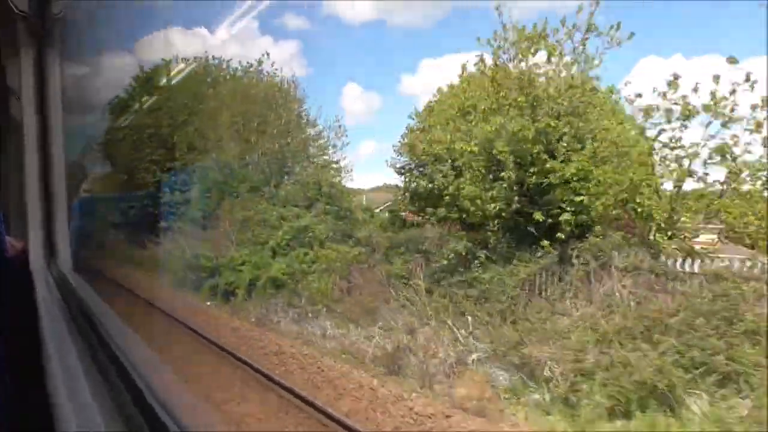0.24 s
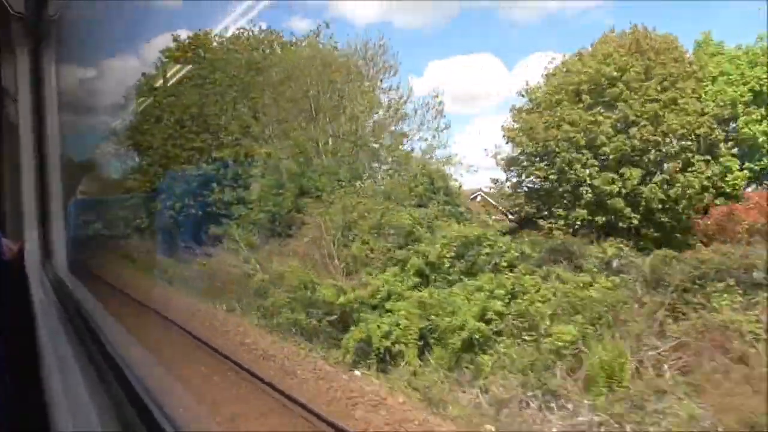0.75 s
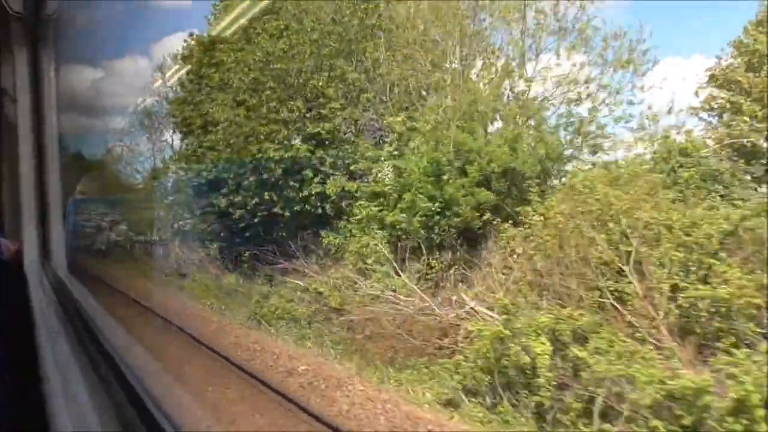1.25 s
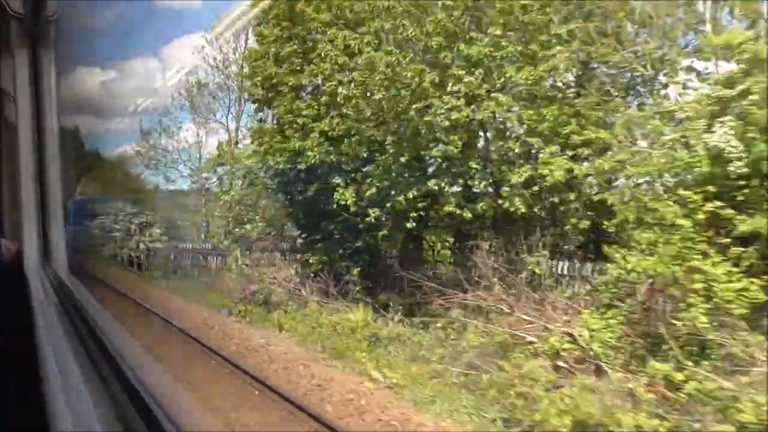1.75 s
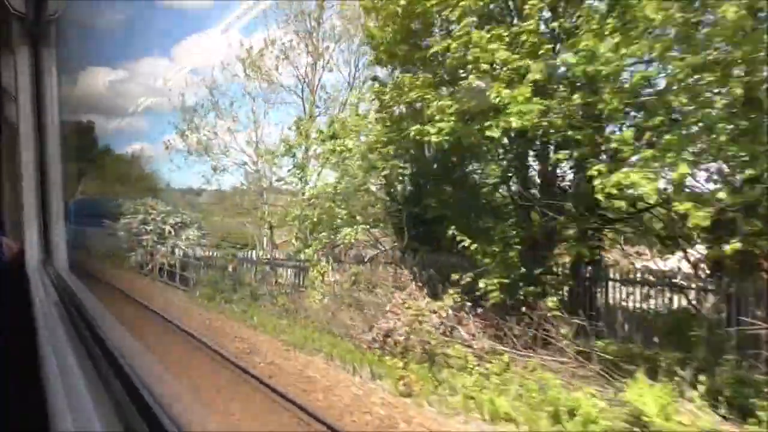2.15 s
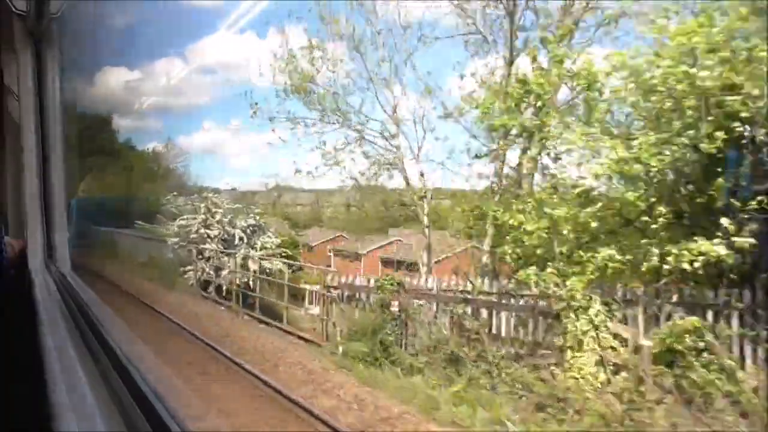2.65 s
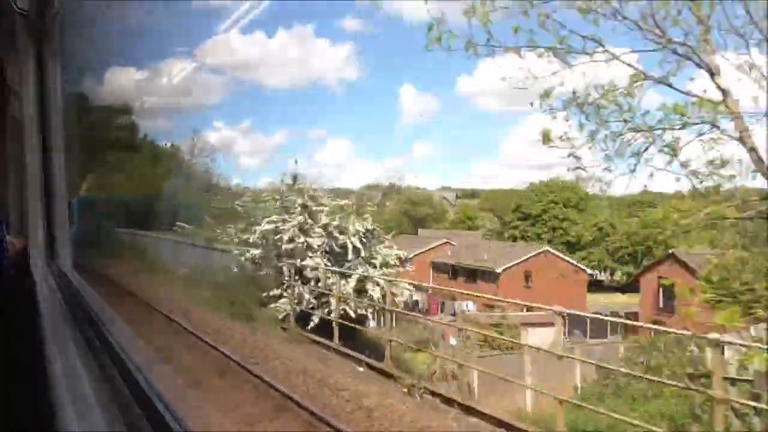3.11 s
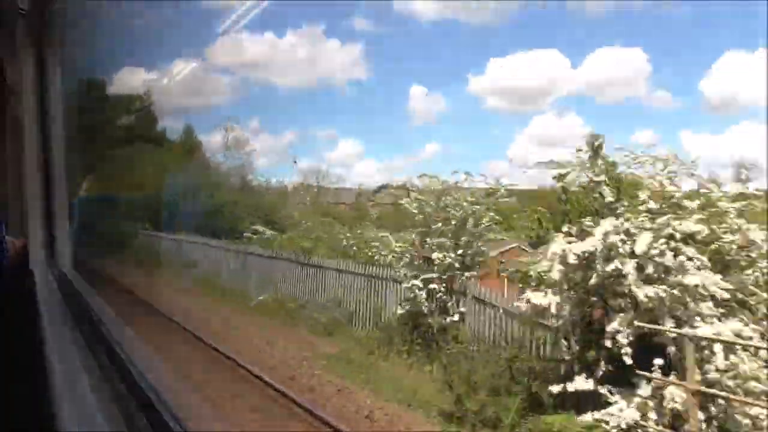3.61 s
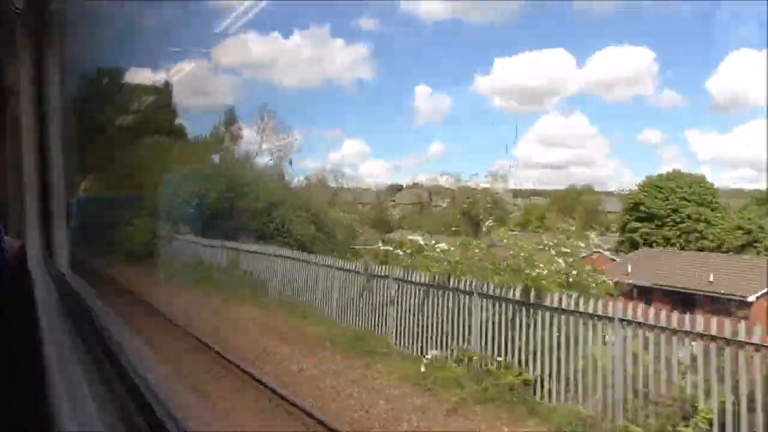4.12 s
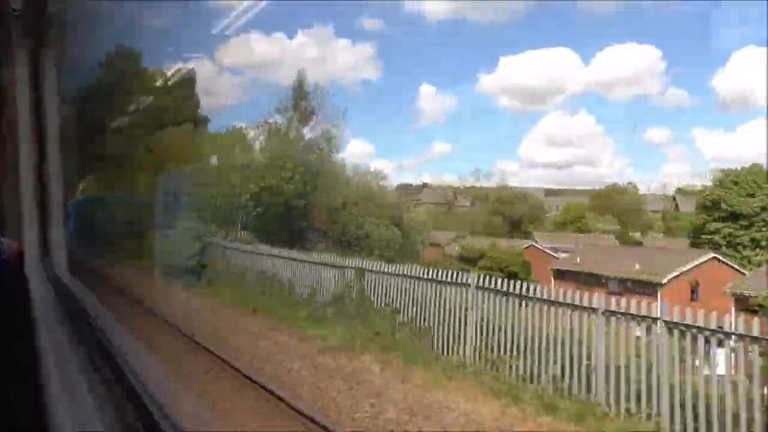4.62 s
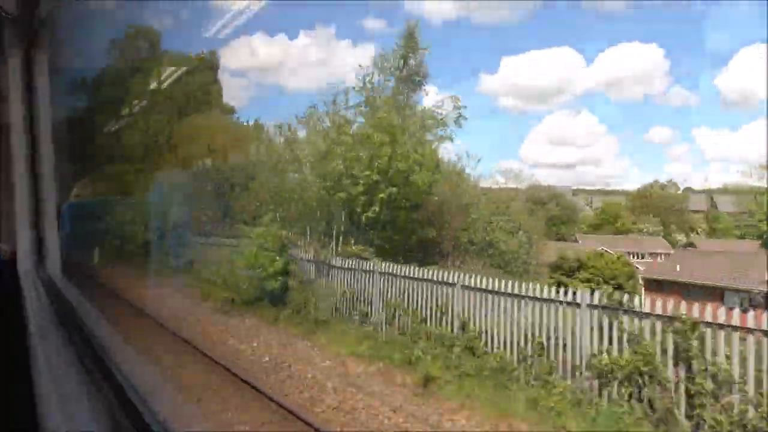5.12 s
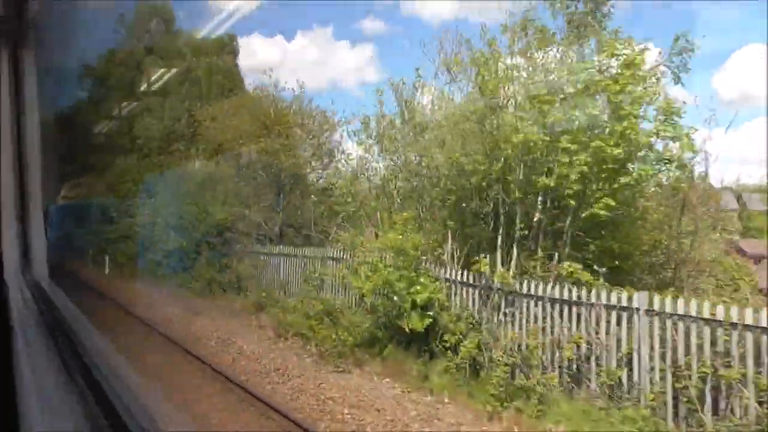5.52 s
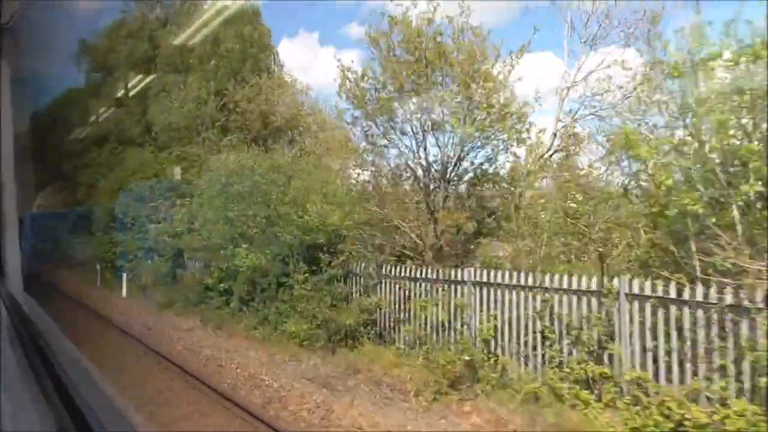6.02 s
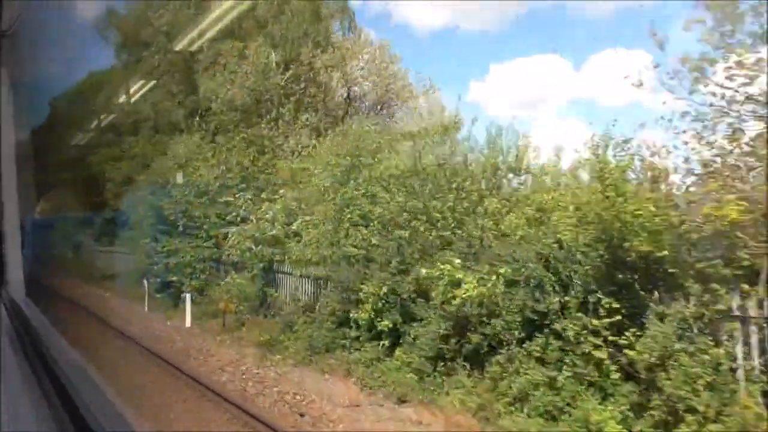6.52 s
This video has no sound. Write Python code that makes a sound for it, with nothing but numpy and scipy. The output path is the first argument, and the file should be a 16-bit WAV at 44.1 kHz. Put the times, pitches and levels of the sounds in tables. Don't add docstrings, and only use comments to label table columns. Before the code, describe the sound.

Inside a passenger coach beside the window, a diesel engine drones steadily under the floor with a slowly beating compressor hum. Wheels rumble continuously, with dull joint knocks and hollow booms around two seconds and a bridge near three. A low singing rail tone swells at about five seconds, while air hisses softly past the glass. Close stereo cabin perspective.

```python
import sys
import numpy as np
from scipy import signal
from scipy.fft import rfft, irfft, next_fast_len
from scipy.io import wavfile
from scipy.ndimage import uniform_filter1d, map_coordinates

SR = 44100
rng = np.random.default_rng(int(sys.argv[2]) if len(sys.argv) > 2 else 0)


def ratio(d):
    e = np.asarray(d, float) / 20
    return 10 ** e


def output_pcm(signal):
    pcm = np.clip(np.atleast_2d(signal).T, -1, 1) * 32767
    wavfile.write(sys.argv[1], SR, np.round(pcm).astype(np.int16))


N = 297675
TIME = np.arange(N) / SR


def unit(x):
    return x / np.sqrt(np.mean(x ** 2) + 1e-20)


def along(points, hz, column=1):
    rows = np.array(points)
    return np.interp(np.log(hz + 1), np.log(rows[:, 0] + 1), rows[:, column])


def curves(rows):
    s, *columns = np.transpose(rows)
    return [np.interp(TIME, s, column) for column in columns]


def wobble(rate):
    coarse = np.arange(0, N + 64, 64)
    knots = rng.standard_normal(int(N * rate / SR) + 4)
    return np.interp(np.arange(N), coarse, map_coordinates(knots, [coarse * rate / SR]))


def swell(start, rise, length, fall):
    return np.interp(TIME, np.cumsum([start, rise, length, fall]), [0, 1, 1, 0])


def filtered(x, response):
    m = next_fast_len(N + 8192)
    return irfft(rfft(x, m) * response(np.fft.rfftfreq(m, 1 / SR)), m)[..., :N]


def angle(hz):
    return 2 * np.pi * np.cumsum(hz * np.ones(N)) / SR


def tone(phase, db):
    return np.sqrt(2) * ratio(db) * np.cos(phase)


# frequency in Hz, likeness from 0 to 1,
# excess level at the left in dB, phase lead of the left in rad.
PORT_PAIR = [(20, .75, -1, .3), (60, .98, 0.5, 0.21), (150, 1, 1, 0.16), (400, 0.96, 0.6, 0.13),
             (600, .96, 0, .1), (724, 0.95, -2, 0.23), (870, 0.9, -3.5, 0.42), (1116, 0.66, -6, 1.1),
             (1300, 0.2, -4, 2.93), (1480, 0.1, 2.5, 3.55), (1870, 0.73, 1, 7), (2100, 0.7, 1, 6),
             (2660, 0.12, -1.5, 6.5), (3200, 0.44, 3.5, 4.6), (3900, 0.86, 2, 6.6), (5300, 0.4, 0, 6.5),
             (6600, 0.07, -0.5, 5.1), (8100, 0, 3, 3.8), (9400, 0.28, 3.2, 3.95), (11800, 0.35, 2.5, 3.8),
             (13500, 0.2, .8, 4), (15000, 0.2, 1, 6.3)]


def noise(spectrum, patchy_db):
    z = signal.stft(rng.standard_normal((2, N)), nperseg=1024)[2]
    field = uniform_filter1d(rng.standard_normal(z.shape[1:]), size=8, axis=0)
    field = uniform_filter1d(field, size=8, axis=1)
    pair = signal.istft(z * ratio(patchy_db * unit(field)), nperseg=1024)[1][:, :N]

    def mixing(hz):
        turn = np.arccos(np.clip(along(PORT_PAIR, hz), 0, 1)) / 2
        return ratio(along(spectrum, hz)) * [np.cos(turn), np.sin(turn)]

    same, other = filtered(pair, mixing)
    return np.array([same + other, same - other]) / np.std(same)


# time in seconds, crank speed in rpm.
CRANK_SPEED = [(0, 1799.85), (1.2, 1799.85), (2.1, 1799.1), (3.1, 1797.5), (3.65, 1799.8), (4.1, 1800.3),
               (5.9, 1800.3), (6.75, 1799.6)]


def engine_cycle():
    return angle(curves(CRANK_SPEED)[0] / 120)


# multiple of the cycle rate (6 is the firing rate), level in dB rms.
ENGINE_ORDERS = [(3, -50), (6, -32), (7, -33), (8, -35), (9, -22), (10, -24), (11, -42), (12, -27),
                 (13, -33.5), (14, -29), (15, -33), (16, -35), (17, -44), (18, -40), (19, -42), (20, -39),
                 (21, -43), (22, -30.5), (24, -34), (25, -40), (32, -40), (35, -48), (39, -47), (42, -45),
                 (43, -47), (46, -43.5), (48, -37.5), (50, -48), (52, -47), (54, -48)]
MOUNT_ORDERS = (8, 11, 13, 15, 18, 20)


def engine(cycle):
    hum = np.zeros(N)
    for order, db in ENGINE_ORDERS:
        start = .345 * order - 6.1 + 3.2 * (order == 6) + 2.2 * (order in MOUNT_ORDERS)
        if order >= 30:
            start = 2 * np.pi * rng.random()
        unsteady = order / 12
        phase = order * cycle + start + .04 * unsteady * wobble(2)
        hum += tone(phase, db + .3 * unsteady * wobble(2))
    return hum


def unevenness(cycle):
    orders = np.setdiff1d(np.arange(23, 73), [order for order, db in ENGINE_ORDERS])
    turn = np.linspace(0, 2 * np.pi, 4096)
    shape = np.zeros(len(turn))
    level_db, scatter_db = -53, 3.5
    for order in orders:
        start = 2 * np.pi * rng.random()
        shape += tone(order * turn + start, level_db + scatter_db * rng.standard_normal())
    return np.interp(cycle % (2 * np.pi), turn, shape)


# multiple of the stroke rate, level in dB rms.
STROKE_HARMONICS = [(1, -44), (2, -27), (3, -40), (4, -50), (5, -49), (6, -51)]


def compressor():
    stroke_hz = 97.22
    load_db = np.linspace(-1.8, 1.2, N)
    stroke = angle(stroke_hz) - .3
    drone = np.zeros(N)
    for k, db in STROKE_HARMONICS:
        drone += tone(k * stroke + .05 * k * wobble(3), db + load_db + .6 * wobble(4))
    return drone


def turbocharger():
    lock_s, crest_s = 3.35, 4.85
    hunting_hz = 5352 + 9 * wobble(25)
    hunting = swell(-1, 1, lock_s - 1, 1) * tone(angle(hunting_hz), -64 + 3 * wobble(5))
    arch_hz = 5381 - 3 * (TIME - crest_s) ** 2
    locked = swell(lock_s, .2, 2.7, .8) * tone(angle(arch_hz + .7 * wobble(5)), -61.5 + wobble(3))
    return hunting + locked


# frequency in Hz, density in dB per Hz.
RUMBLE_SPECTRUM = [(15, -30), (22, -15), (40, -13.5), (55, -6.5), (76, -2), (102, -1.5), (135, -0.5),
                   (165, 4.5), (215, 4), (270, -2), (320, 1), (380, -6.5), (520, -11.5), (700, -58.5)]


def wheel_rumble(hollow, jolt):
    return ratio(-25.5 + 0.5 * hollow + 0.26 * jolt) * noise(RUMBLE_SPECTRUM, patchy_db=0.5)


# frequency in Hz, density in dB per Hz.
ROAR_SPECTRUM = [(250, -49), (350, -4), (450, -1.5), (580, 0.5), (720, 1), (860, -3), (1040, -5.5),
                 (1250, -11.5), (1500, -19), (1800, -37), (2400, -52)]


def body_roar(hollow, echo_db, firing, jolt):
    roar_db = -28 + 0.8 * hollow + 0.37 * echo_db
    return ratio(roar_db + 1.1 * firing + .15 * jolt) * noise(ROAR_SPECTRUM, patchy_db=.7)


# frequency in Hz, density in dB per Hz.
RUSH_SPECTRUM = [(880, -31), (1500, -2.5), (1770, -3.5), (2180, 1), (2740, -6.5), (3050, -7), (3710, -3),
                 (4130, -2.5), (4890, -7.5), (5420, -6), (5880, -12), (6800, -15.5), (8840, -25),
                 (15000, -120)]


def air_rush(echo_db, firing, jolt):
    return ratio(-45 + 0.53 * echo_db + .2 * firing + 0.12 * jolt) * noise(RUSH_SPECTRUM, patchy_db=0.17)


# frequency in Hz, density in dB per Hz.
HISS_SPECTRUM = [(3650, -33), (6200, -6.5), (6850, -4.5), (8740, 1), (9620, 1), (11500, -3), (13700, -9.5),
                 (14400, -13.5), (15800, -22)]


def window_hiss(echo_db, firing):
    return ratio(-49 + echo_db + .2 * firing + 0.23 * wobble(9.7)) * noise(HISS_SPECTRUM, patchy_db=1.4)


# time in seconds, echo in dB.
LINESIDE_ECHO = [(0, 0), (1.7, 1), (2.7, 0), (3.35, -2), (4.65, -1.5), (5.45, -2.5), (5.8, -1.5),
                 (6.5, -3.5), (6.75, -3.5)]
# start in seconds, length in seconds, extra echo in dB.
PASSING_OBJECTS = [
    (1.98, .02, 2.5),
    (2.13, .02, 1.5),
    (2.765, .07, 4),
]


def lineside_echo():
    echo_db = curves(LINESIDE_ECHO)[0]
    for start, length, db in PASSING_OBJECTS:
        echo_db = echo_db + db * swell(start, .025, length, .16)
    return echo_db


# frequency in Hz, density in dB per Hz.
BOOM_SPECTRUM = [(90, -38), (150, -0.5), (215, 2.5), (300, 2), (450, -9), (700, -47.5)]
# start in seconds, length in seconds, boom level in dB rms.
HOLLOW_TRACK = [
    (1.935, 0.25, -30),
    (2.706, 0.51, -28),
    (3.797, 0.23, -37),
    (5.7, 0.2, -31.5),
]


def hollow_decks():
    return [swell(start, .1, length, 0.33) for start, length, db in HOLLOW_TRACK]


def hollow_boom(decks, jolt):
    gain = ratio(-40.5)
    for (start, length, db), deck in zip(HOLLOW_TRACK, decks):
        gain = gain + ratio(db) * deck
    return gain * ratio(.8 * jolt) * noise(BOOM_SPECTRUM, patchy_db=0.7)


def rolling(cycle):
    decks = hollow_decks()
    hollow = np.max(decks, axis=0)
    echo_db = lineside_echo()
    firing = np.cos(6 * cycle - .3)
    jolt = wobble(9)
    track = wheel_rumble(hollow, jolt) + hollow_boom(decks, jolt)
    roar = body_roar(hollow, echo_db, firing, jolt)
    return track + roar + air_rush(echo_db, firing, jolt) + window_hiss(echo_db, firing)


# frequency in Hz, density in dB per Hz.
KNOCK_SPECTRUM = [(100, -30), (250, 5), (700, 10), (1200, -19), (1700, -32), (4000, -24), (6000, -36),
                  (12000, -60)]
# time in seconds, peak level in dB.
RAIL_JOINTS = [(1.8, -15), (2.002, -16), (3.277, -16), (4.655, -16)]


def joints():
    t60_s, loss_db = .07, 5
    envelope = np.zeros(N)
    for start, db in RAIL_JOINTS:
        decay_db = 60 * np.abs(TIME - start) / t60_s
        envelope += ratio(db - loss_db - decay_db) * (TIME > start)
    return envelope * noise(KNOCK_SPECTRUM, patchy_db=-4.5)


# start in seconds, length in seconds, level in dB rms.
RIPPLED_RAIL = [(2.75, 0.27, -40), (3.26, 0.49, -27.5), (4.0, .4, -36), (4.545, 0.8, -21), (5.6, 0.27, -38)]


def ripple(cycle):
    settled_hz, excess_hz, from_s, settle_s = 204, 24, 2.8, .65
    turn_s, climb_hz_per_s, crossing_s, fade_s = 5.2, 4.5, 3.7, .2
    glide_hz = excess_hz * np.exp(-np.maximum(TIME - from_s, 0) / settle_s)
    climb_hz = climb_hz_per_s * np.maximum(TIME - turn_s, 0)
    phase = angle(settled_hz + glide_hz + climb_hz)
    opposed = (14 * cycle - phase)[round(crossing_s * SR)] + 1.85
    stretches = [ratio(db) * swell(start, fade_s, length, fade_s) for start, length, db in RIPPLED_RAIL]
    depth = np.max(stretches, axis=0)
    return depth * tone(phase + opposed + .15 * wobble(4), .8 * wobble(6))


def scene():
    cycle = engine_cycle()
    machinery = engine(cycle) + unevenness(cycle) + compressor() + turbocharger()
    return machinery + rolling(cycle) + joints() + ripple(cycle)


def roll_off(x):
    return signal.sosfilt(signal.butter(12, 15730, fs=SR, output="sos"), x)


def record(dry):
    def half(hz):
        level = ratio(along(PORT_PAIR, hz, column=2) / 2)
        return level * np.exp(.5j * along(PORT_PAIR, hz, column=3))

    ports = filtered(dry, lambda hz: np.array([half(hz), 1 / half(hz)]))
    return roll_off(ports)


dry = scene()
out = record(dry)
output_pcm(out)
```